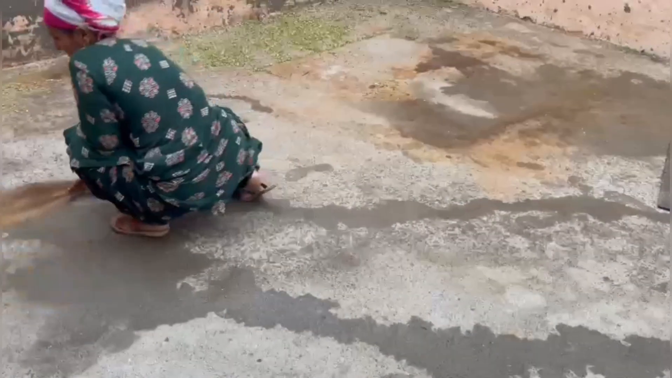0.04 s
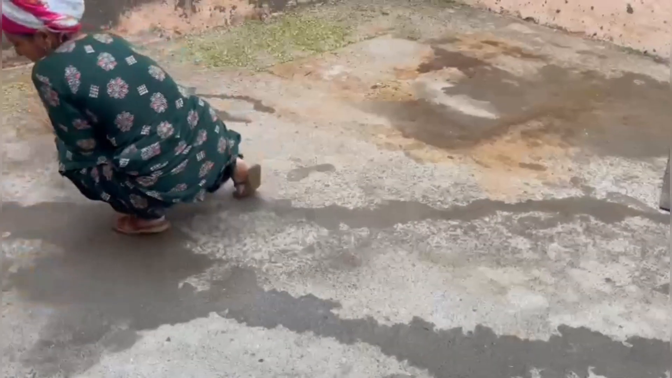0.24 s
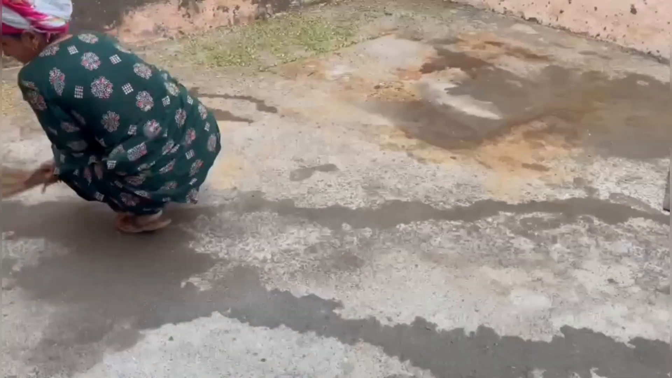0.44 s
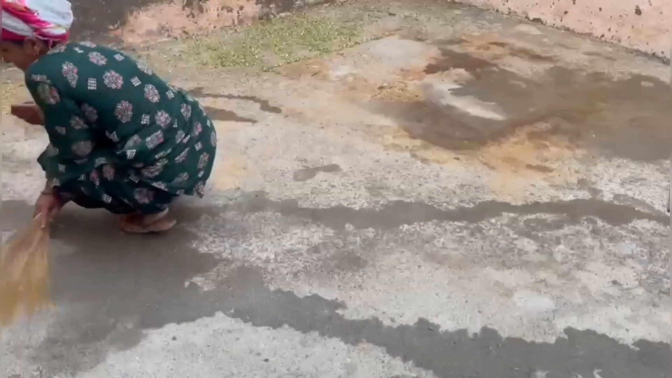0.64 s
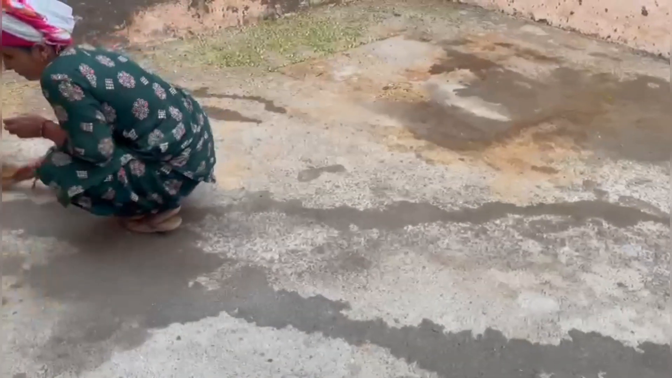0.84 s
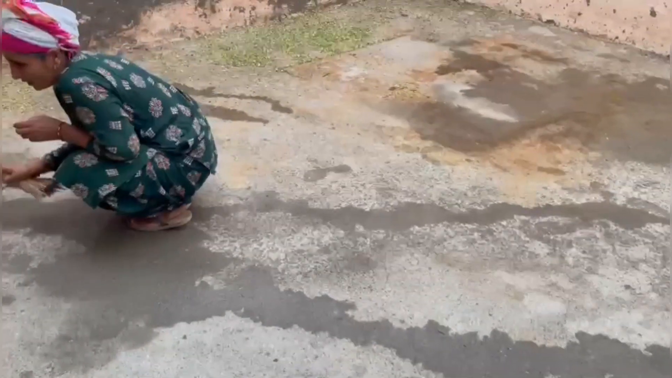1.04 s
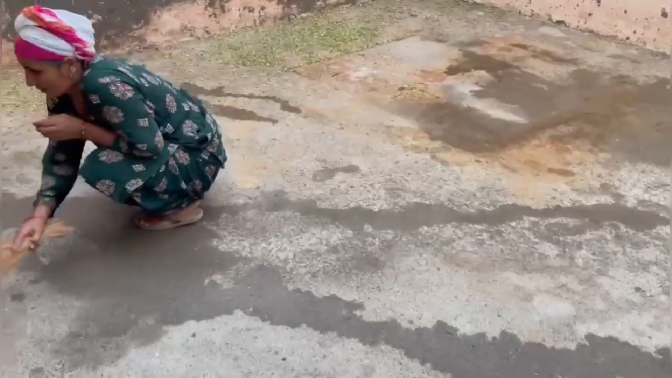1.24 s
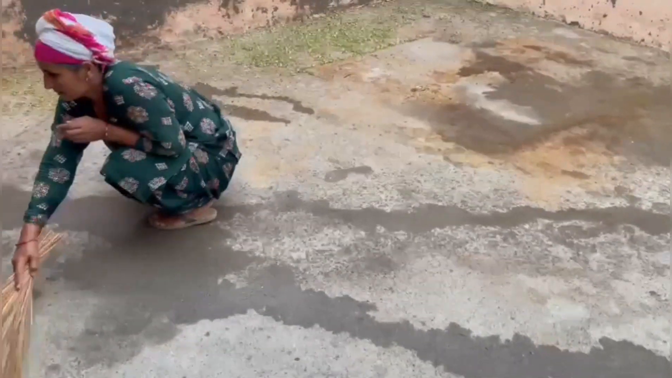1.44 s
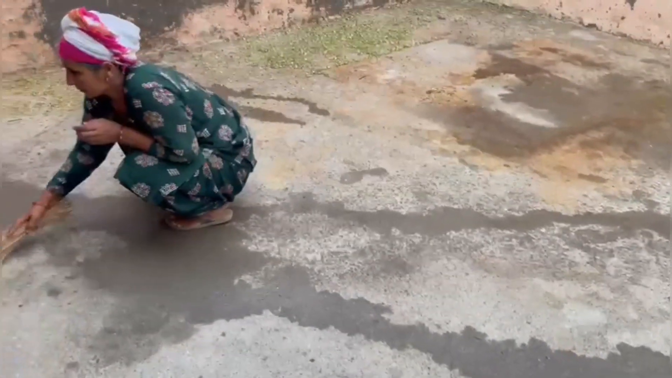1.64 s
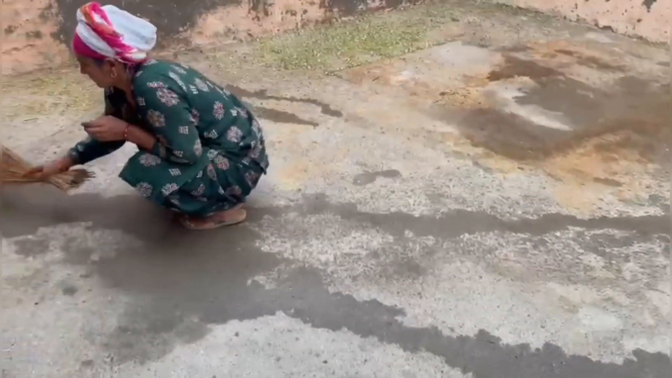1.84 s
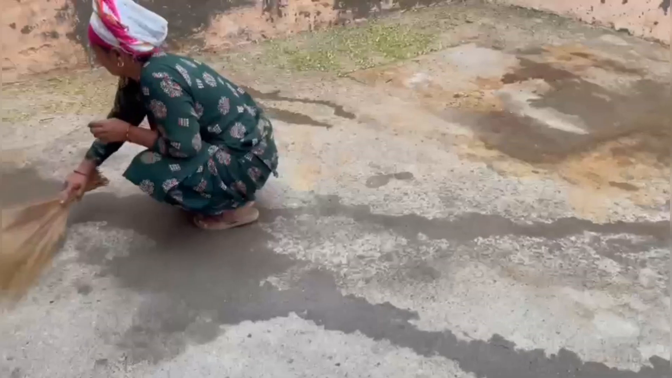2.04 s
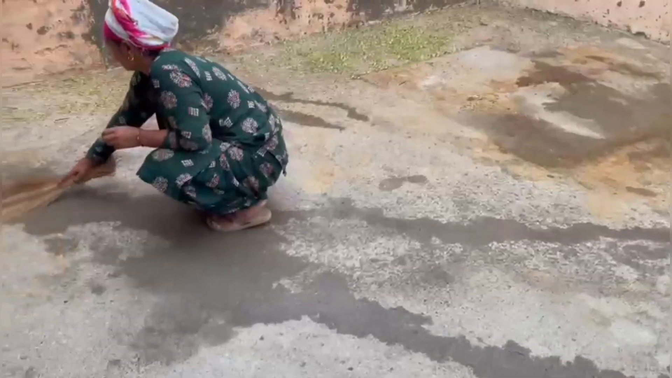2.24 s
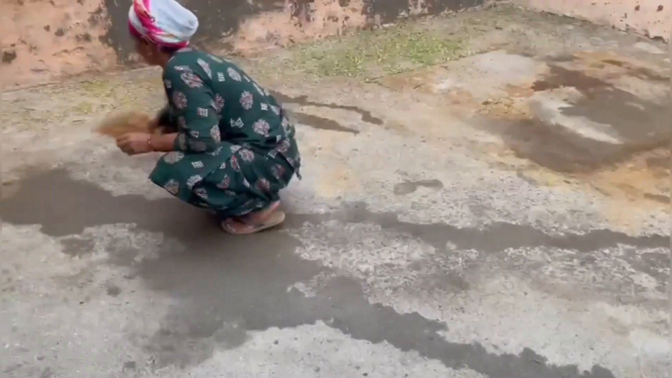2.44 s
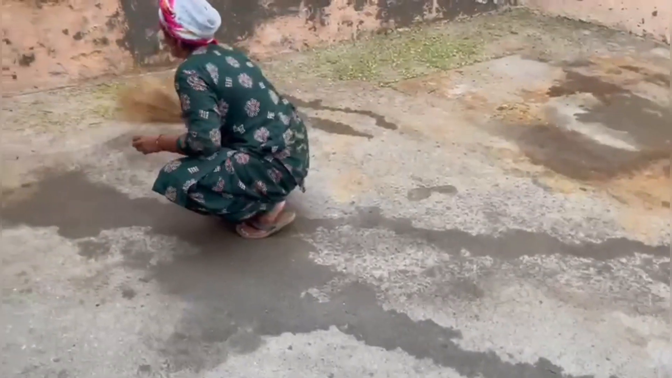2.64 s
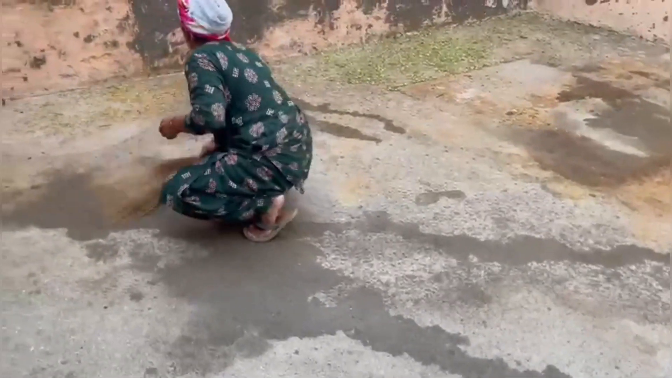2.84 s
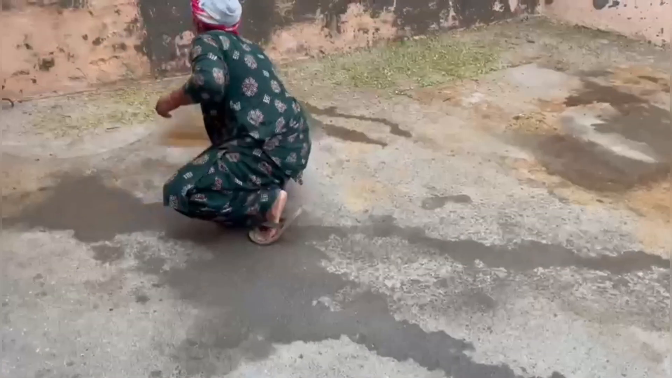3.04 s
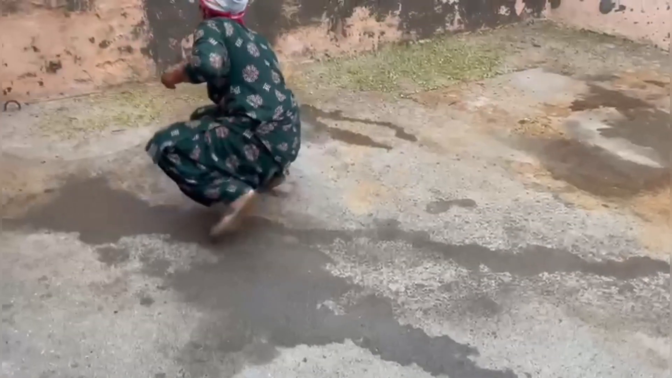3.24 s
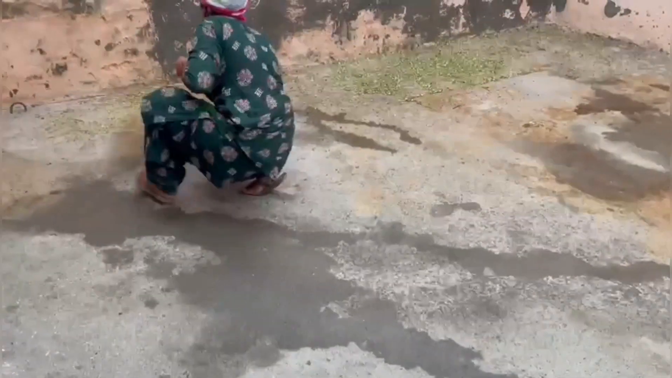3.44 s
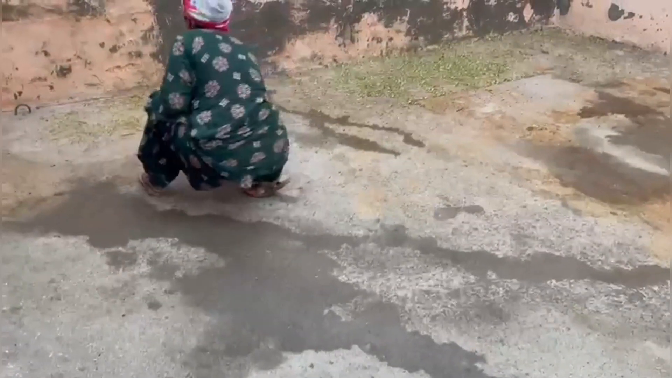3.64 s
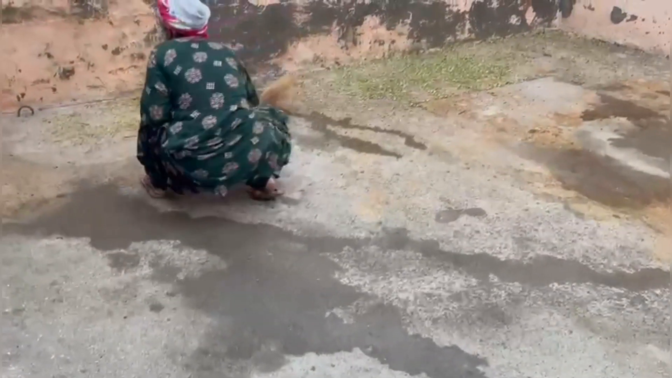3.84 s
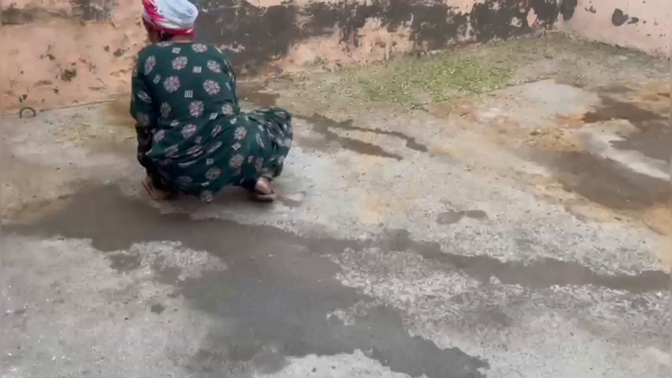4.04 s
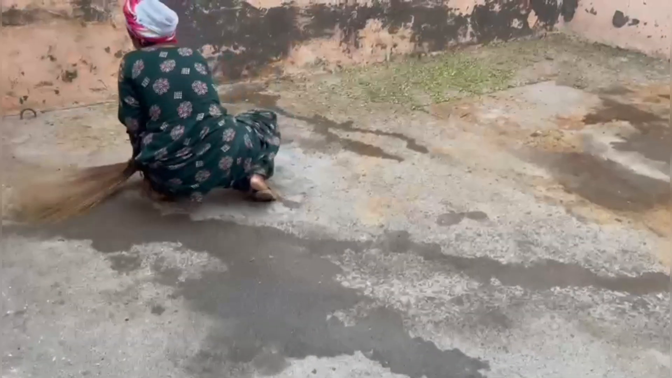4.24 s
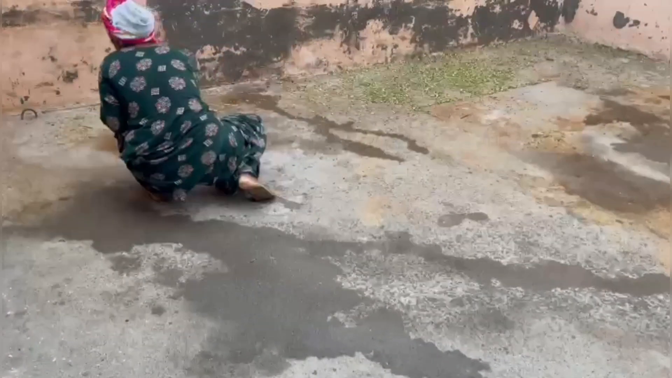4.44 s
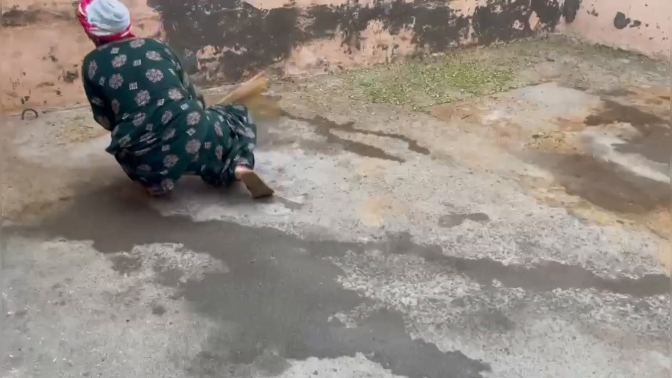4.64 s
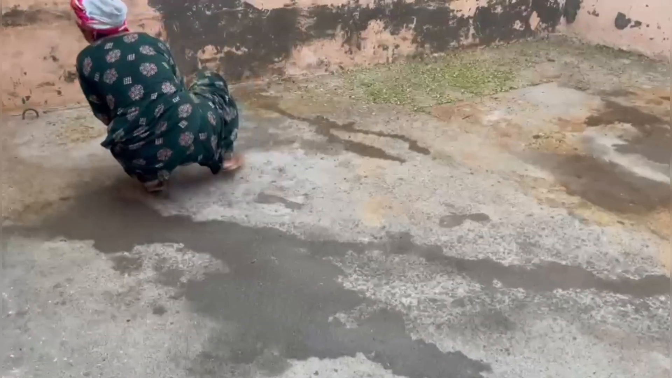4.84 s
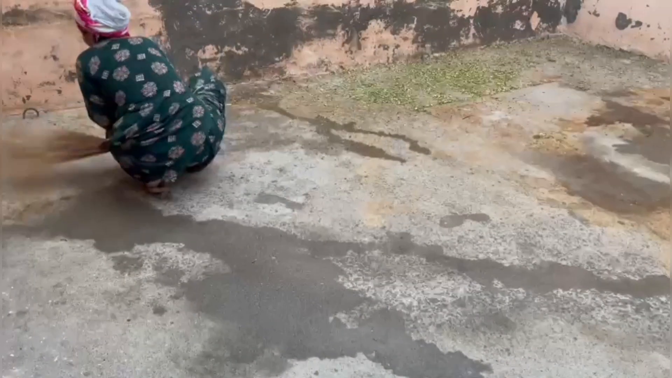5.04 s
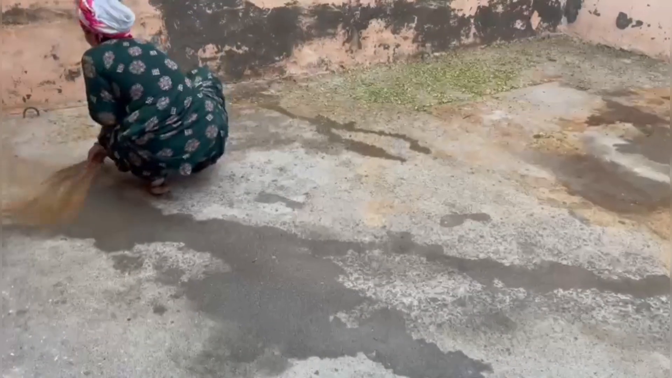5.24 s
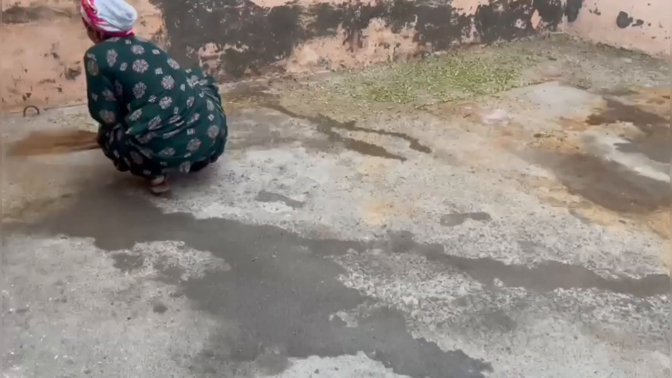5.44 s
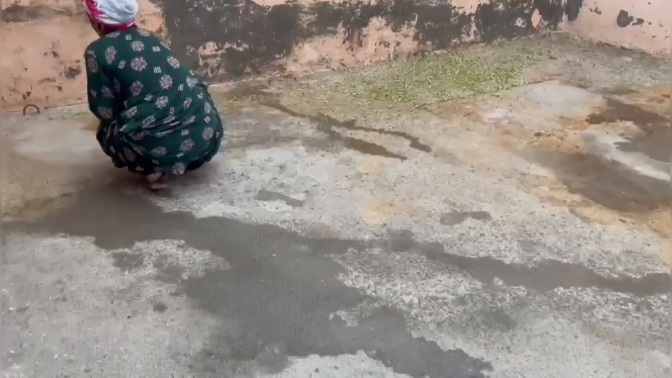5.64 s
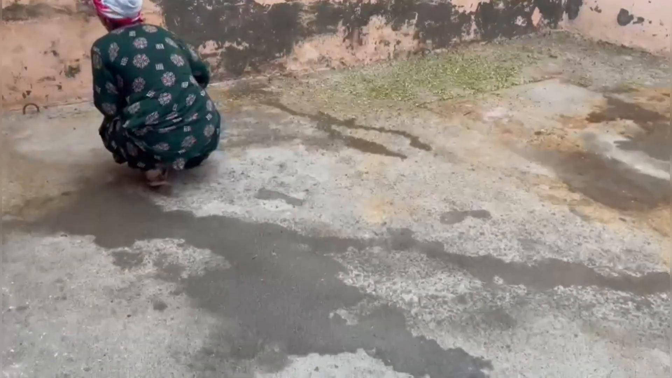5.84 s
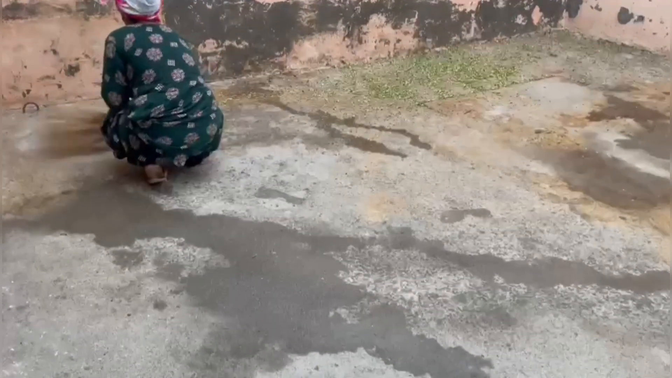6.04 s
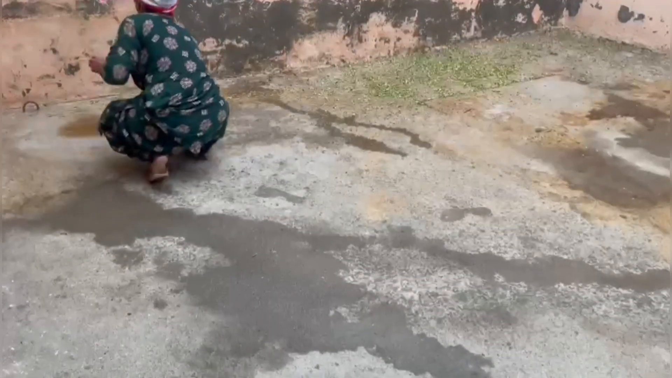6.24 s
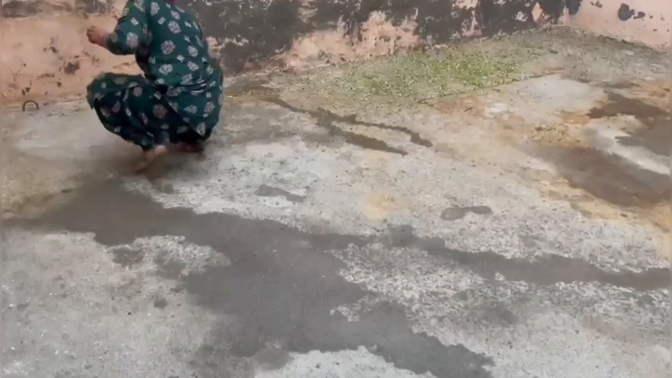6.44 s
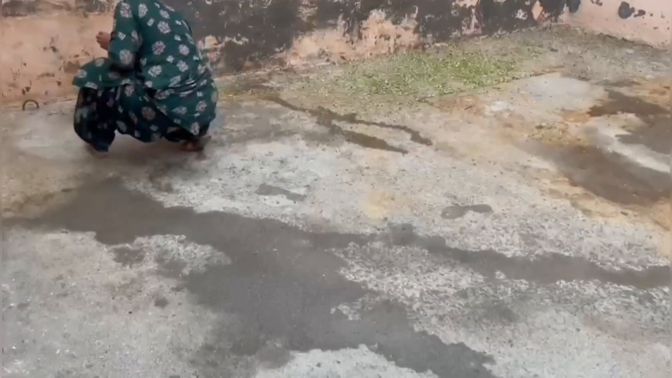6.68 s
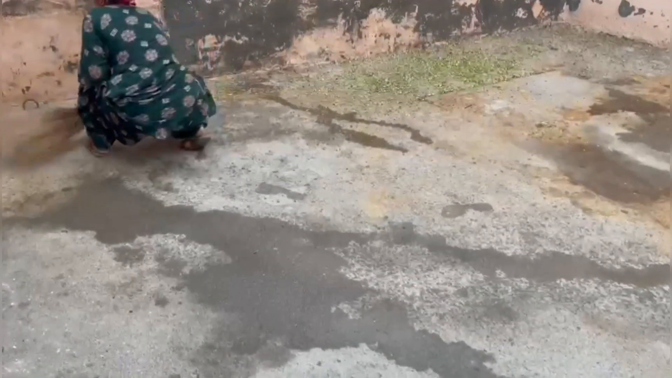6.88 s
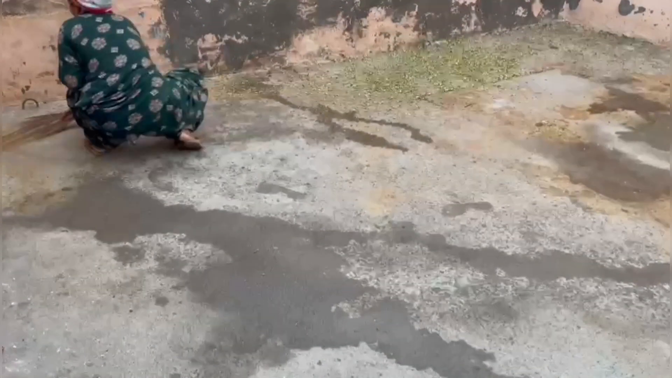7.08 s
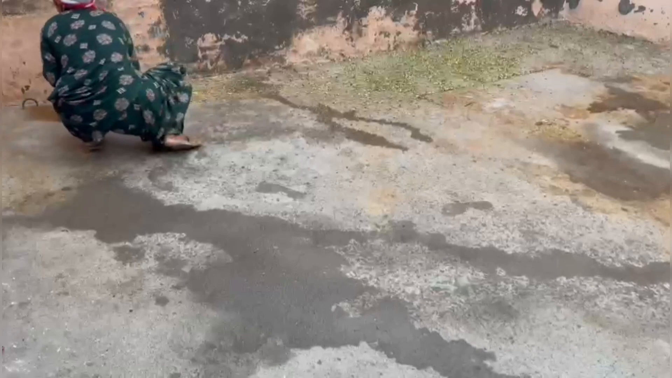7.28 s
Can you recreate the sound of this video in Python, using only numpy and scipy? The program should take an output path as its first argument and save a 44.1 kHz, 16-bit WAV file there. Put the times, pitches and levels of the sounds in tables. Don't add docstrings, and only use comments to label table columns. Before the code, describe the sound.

A straw broom swishes in quick, raspy strokes over gritty wet concrete in a walled yard, with sandal slaps and distant traffic rumble.

```python
import sys
import numpy as np
from scipy import signal
from scipy.fft import rfft, irfft
from scipy.io import wavfile
from scipy.ndimage import uniform_filter1d

SR = 44100
rng = np.random.default_rng(int(sys.argv[2]) if len(sys.argv) > 2 else 0)


def boost_factor(decibels):
    exponent = np.asarray(decibels, float) / 20
    return 10 ** exponent


def log_audio(samples):
    frames = np.atleast_2d(samples).T
    limited = np.clip(frames, -1, 1)
    pcm = np.round(limited * 32767).astype(np.int16)
    wavfile.write(sys.argv[1], SR, pcm)


N = 322371
TIME = np.arange(N) / SR
HZ = np.maximum(np.arange(N // 2 + 1) * SR / N, 1)


def unit(x):
    return x / np.sqrt(np.mean(x ** 2))


def on_hz(table, column=1):
    table = np.array(table)
    return np.interp(np.log(HZ), np.log(np.maximum(table[:, 0], 1)), table[:, column])


def colour(x, gain):
    return irfft(rfft(x) * gain, N)


def ring(x, hz, width_hz):
    return signal.lfilter(*signal.iirpeak(min(hz, .45 * SR), hz / width_hz, fs=SR), x)


def walk(rate):
    hold = int(SR / rate)
    levels = np.repeat(rng.standard_normal(N // hold + 1), hold)
    return 1.46 * uniform_filter1d(uniform_filter1d(levels, hold), hold)[:N]


def burst(s, decay_s, rise_s):
    start = int(s * SR)
    t = TIME[:min(SR // 3, N - start)]
    return slice(start, start + len(t)), (1 - np.exp(-t / rise_s)) * np.exp(-t / decay_s)


def swells(rows):
    return sum(db * np.exp(-((TIME - s) / max(length_s, .02)) ** 2) for s, length_s, db in rows)


# f/Hz, level/dB [per Hz]
TOWN_COLOUR = [(15, -44), (25, -1.5), (78, 2), (183, -11.5), (340, -30), (587, -31.5), (1040, -39.5),
               (1240, -35), (1710, -35), (2030, -38), (2740, -53.5), (3030, -74), (9500, -39.5),
               (12400, -78.5), (20900, -120)]
# t/s, length/s, level/dB
ENGINE_SURGES = [
    (.66, 0.11, 6),
    (2.15, .2, -8),
    (3.03, 0.1, -9),
    (3.35, 0.3, 3),
    (5.65, 0.077, 2),
    (6.1, 0.041, 3.5),
    (6.6, 0.12, 5),
]
# t/s, length/s, level/dB [over the rumble]
VEHICLE_PASSES = [
    (1.2, .08, -7.5),
    (2.1, 0.39, 2.5),
    (2.9, 0.27, 3.5),
    (3.65, 0.15, 7.5),
    (4.7, 0.3, 2.5),
    (6.4, 0.067, 2.5),
]
ENGINE_FAR_DB, ENGINE_NEAR_DB, ENGINE_NEARS_S, ENGINE_TAKES_S = -51, -45, 4.68, 0.1
DRONE_HZ, DRONE_DB = 48.6, 1
TRAFFIC_DB, FLICKER_DB, AIR_DB = -50, 0.5, -55
VAN_S, VAN_LENGTH_S, VAN_HZ, VAN_DB = 2.11, 0.38, 100, -47.5


def town():
    far = rfft(rng.standard_normal((2, N))) * boost_factor(on_hz(TOWN_COLOUR))
    deep = 1 / (1 + (HZ / 82) ** 8)
    bass = 1 / (1 + (HZ / 300) ** 4)
    drone, traffic, air = (unit(irfft(far * share, N)) for share in (deep, bass * (1 - deep), 1 - bass))
    drone = drone + boost_factor(DRONE_DB) * unit(ring(rng.standard_normal(N), DRONE_HZ, 8.4))
    nearing = .5 + .5 * np.tanh((TIME - ENGINE_NEARS_S) / ENGINE_TAKES_S)
    drone_db = ENGINE_FAR_DB + (ENGINE_NEAR_DB - ENGINE_FAR_DB) * nearing + swells(ENGINE_SURGES)
    traffic_db = TRAFFIC_DB + swells(VEHICLE_PASSES) + FLICKER_DB * walk(11)
    low = drone * boost_factor(drone_db - 2) + traffic * boost_factor(traffic_db)
    van = unit(ring(rng.standard_normal(N), VAN_HZ, 7.4)) * np.exp(-((TIME - VAN_S) / VAN_LENGTH_S) ** 4)
    return low + boost_factor(VAN_DB) * van + air * boost_factor(AIR_DB + 1.6 * walk(2.9))


BIRD_S, BIRD_HOLD_S, BIRD_HZ, BIRD_DB = 4.99, 0.14, 2830, -58
BIRD_RISE_S, BIRD_FADE_S, BIRD_SAG_DB, BIRD_FLUTTER_DB = 0.089, 0.043, -9, 2.5


def bird():
    tone = np.sin(2 * np.pi * np.cumsum(BIRD_HZ + 45 * walk(200)) / SR)
    t = TIME - BIRD_S
    edge = np.minimum(t, 0) / BIRD_RISE_S + np.maximum(t - BIRD_HOLD_S, 0) / BIRD_FADE_S
    sag_db = BIRD_SAG_DB * np.clip(t / BIRD_HOLD_S, 0, 1)
    return tone * np.exp(-edge ** 2) * boost_factor(BIRD_DB + sag_db + BIRD_FLUTTER_DB * walk(130))


# t/s, peak level/dB, thud f/Hz, sole slap level/dB [re thud], smear/s
SANDAL_STEPS = [
    (0.322, -38.5, 226, 7, 0.034),
    (1.739, -36.5, 136, -4, 0.014),
    (2.067, -39, 174, -35, 0.064),
    (2.732, -38, 121, -22.5, 0.015),
    (3.228, -30, 191, -25, 0.031),
    (3.619, -30, 230, -11, 0.0095),
    (3.951, -34, 174, -31, 0.016),
    (4.787, -27, 194, 0, 0.017),
    (6.046, -44, 178, 1, 0.019),
    (6.719, -49.5, 184, 4.5, 0.061),
]
HEEL_LATE_S = 0.011


def sandals():
    out = np.zeros((2, N))
    for s, db, hz, slap_db, smear_s in SANDAL_STEPS:
        at, shape = burst(s - .008, max(smear_s, .003), 0.014)
        noise = rng.standard_normal((2, 2, SR // 3))[..., :len(shape)]
        slap = unit(ring(noise[0], 1300, 1000)) + 0.033 * unit(ring(noise[0], 6000, 2500))
        heel = np.interp(TIME[:len(shape)] - HEEL_LATE_S, TIME[:len(shape)], shape)
        thud = heel * unit(ring(noise[1], hz, 57))
        out[:, at] += boost_factor(db) * (boost_factor(slap_db) * shape * slap + thud)
    return out


# t/s, peak level/dB, centre f/Hz, decay/s
STRAW_TICKS = [
    (0.318, -34, 1840, 0.029),
    (0.5737, -31.5, 8250, 0.067),
    (2.061, -30, 7640, 0.019),
    (3.5342, -40, 8830, 0.03),
    (4.2414, -35, 8070, 0.052),
    (5.0142, -40, 2880, 0.058),
    (5.1966, -36, 8700, 0.041),
    (6.104, -36, 8230, 0.03),
    (6.7087, -31, 8800, 0.023),
    (6.9466, -31, 8830, 0.03),
]


def ticks():
    out = np.zeros((2, N))
    for s, db, hz, decay_s in STRAW_TICKS:
        at, shape = burst(s, max(decay_s, .001), 0.0018)
        noise = rng.standard_normal((2, SR // 3))[:, :len(shape)]
        out[:, at] += boost_factor(db - 12.0) * shape * unit(ring(noise, hz, 0.48 * hz))
    return out


# t/s, peak level/dB,
# centre f/Hz, width f/Hz
GRIT_KNOCKS = [(.310, -26, 1230, 1500), (.319, -22.5, 1680, 4460), (.334, -38.5, 1600, 2005),
               (.352, -30, 1900, 1425), (.365, -33, 2000, 1500), (1.2165, -41, 8950, 6060),
               (1.221, -30, 8200, 9050), (1.237, -24, 10000, 8000), (1.243, -32, 6000, 8000),
               (1.254, -25, 10000, 7000), (1.259, -27, 10000, 7000), (1.287, -36, 9800, 5000),
               (1.398, -37, 10000, 3000), (2.020, -56, 10100, 3020), (2.063, -30, 8500, 7000),
               (2.7945, -29.5, 7000, 9060), (2.810, -34, 8500, 5030), (3.467, -42, 4180, 4000),
               (4.102, -49, 10070, 1977), (4.122, -45, 9820, 2000), (5.014, -32, 9800, 4000),
               (5.13, -43, 9400, 4000), (5.135, -45, 9600, 4000), (5.141, -38.5, 9800, 4030),
               (6.609, -34, 8400, 6400), (6.808, -43, 8500, 6040), (6.947, -46, 8700, 7000)]
GRIT_SPREAD = .75


def grit():
    out = np.zeros((2, N))
    knocks = rng.standard_normal((len(GRIT_KNOCKS), 2, 400)) * np.exp(-TIME[:400] / 0.0015)
    for (s, db, hz, width_hz), knock in zip(GRIT_KNOCKS, knocks):
        knock = ring(ring(knock, hz, GRIT_SPREAD * width_hz), hz, GRIT_SPREAD * width_hz)
        start = int(s * SR)
        out[:, start:start + 400] += boost_factor(db - 1.5) * knock / np.abs(knock).max(axis=1, keepdims=True)
    return out


# straws touch t/s, time to full speed/s, hold/s, scrape level/dB,
# low scrape from pressure level/dB [re scrape]
BROOM_STROKES = [(-.08, 0.13, 0.083, -17, -17), (0.553, 0.051, 0.031, -31.5, -21),
                 (0.623, 0.14, 0.084, -18, -16), (1.187, 0.061, 0.037, -52, -11),
                 (1.393, 0.093, 0.075, -27, -14.5), (1.558, 0.12, 0.068, -19.5, -16),
                 (2.069, .19, .17, -17, -16), (2.817, .05, 0.039, -40, -12), (2.899, 0.12, 0.15, -20, -15),
                 (3.512, 0.16, 0.13, -21.5, -14.5), (4.211, 0.047, 0.012, -38.5, -17),
                 (4.284, 0.14, 0.074, -19.5, -18), (4.5, 0.057, 0.044, -29.5, -14.5),
                 (4.729, 0.064, 0.022, -47.5, -3.5), (5.178, 0.027, 0.027, -38, -20),
                 (5.223, .14, .16, -17.5, -17), (5.589, .1, 0.083, -29.5, -11.5),
                 (6.087, 0.028, 0.035, -41.5, -14.5), (6.139, .13, .1, -21.5, -13),
                 (6.402, 0.054, 0.029, -39.5, -7), (6.92, 0.047, 0.039, -37, -15.5),
                 (6.972, .11, 0.012, -20.5, -15.5), (7.088, 0.17, .1, -23.5, -14.5)]
TOUCH_S, TOUCH_DB, RISE_BEND = .022, -25.5, 1.42
SAG_DB_PER_S, LIFT_DB_PER_S, LIFT_KNEE_S = 13, 207, 0.028
TRAIL_DB, TRAIL_DB_PER_S = -14, 103
SLOW_PRESS, TIPS_FIRST, SLOW_DULL = 0.12, 0.033, 0.02


def effort():
    power, press, bright = 1e-10, 0, 0
    coarse = TIME[::32]
    for s, rise_s, hold_s, db, press_db in BROOM_STROKES:
        t = coarse - s
        early_db = TOUCH_DB * np.clip(1 - t / rise_s, 0, 1) ** RISE_BEND
        held = np.clip(t - rise_s, 0, hold_s)
        lifted = np.maximum(t - rise_s - hold_s, 0)
        lift_db = -LIFT_DB_PER_S * (np.hypot(lifted, LIFT_KNEE_S) - LIFT_KNEE_S)
        trail_db = TRAIL_DB - TRAIL_DB_PER_S * lifted
        late_db = 10 * np.log10(boost_factor(2 * lift_db) + boost_factor(2 * trail_db)) - SAG_DB_PER_S * held
        p = (np.clip(t / TOUCH_S, 0, 1) * boost_factor(db + early_db + late_db)) ** 2
        late_db = np.maximum(late_db, -50)
        power = power + p
        press = press + p * (press_db - SLOW_PRESS * late_db)
        bright = bright + p * (SLOW_DULL * late_db - TIPS_FIRST * early_db)
    return (np.interp(TIME, coarse, v) for v in (10 * np.log10(power), press / power, bright / power))


# f/Hz, level/dB [per Hz]
STRAW_COLOUR = [(250, -27), (600, -25.5), (1000, -20.5), (1700, -11.5), (2500, -16), (5000, -14),
                (6500, -13.5), (8000, -9.5), (9500, -2.5), (10500, 2), (11300, -3), (12500, -39)]
SLIPS_PER_S, SLIP_SCATTER_DB, PATCHY_DB = 4000, 2, 2


def broom():
    scrape_db, press_db, bright_db = effort()
    busy = .3 + .7 * boost_factor(.5 * (scrape_db - scrape_db.max()))
    out, sway = np.zeros((2, N)), walk(14)
    for hz in 300 * 2 ** np.arange(0, 5.6, .4):
        odds = np.minimum(SLIPS_PER_S * busy * (hz / 3000) ** .6 / SR, 1)
        slips = (rng.random((2, N)) < odds) * rng.choice([-1, 1], (2, N)) / np.sqrt(odds)
        slips = slips * boost_factor(SLIP_SCATTER_DB * rng.exponential(size=(2, N)))
        group = unit(ring(slips, hz, 0.33 * hz))
        thick = 1 / (1 + (hz / 2700) ** 4)
        db = thick * (press_db + 14.5) + (1 - thick) * bright_db * np.log2(hz / 6000)
        out += group * np.sqrt(hz) * boost_factor(db + PATCHY_DB * (walk(30) + 0.16 * sway))
    return unit(colour(out, boost_factor(on_hz(STRAW_COLOUR)))) * boost_factor(scrape_db + 4.0)


YARD_T60_S, YARD_DB, YARD_TOP_HZ = 0.71, -11, 7000


def scene():
    near = broom() + sandals() + ticks() + grit() + bird()
    echo = rng.standard_normal((2, N)) * np.exp(-np.log(1000) * TIME / YARD_T60_S) * (TIME > .012)
    echo = echo / np.sqrt(np.sum(echo ** 2, axis=1, keepdims=True))
    echo = rfft(echo) / (1 + (HZ / YARD_TOP_HZ) ** 2)
    return near + boost_factor(YARD_DB) * colour(near, echo) + town()


# f/Hz, phase/rad
LEFT_LEAD = [(0, 0), (1100, .3), (1500, 2.9), (1850, 3.6), (2250, 6.28), (5400, 6.7), (6500, 6.35),
             (7500, 7.0), (8350, 6.28), (8800, 6.28), (9700, 3.3), (10000, 3.14), (10450, 3.14),
             (10850, 2.4), (11200, .8), (11500, 0), (13000, 0)]
# f/Hz, likeness [0-1], left minus right level/dB
PORT_PAIR = [(60, .99, .5), (170, .88, 4.5), (500, .55, 2), (1000, .5, 2), (1550, .78, 0), (1900, .55, 0),
             (2500, .85, .5), (3000, .4, 3), (3900, .85, 1.5), (5300, .45, 4.5), (6500, .85, 1.5),
             (7400, .7, 2.5), (8300, 1, 0), (10500, .98, 0), (11100, .7, 0), (11500, .9, 0),
             (11900, .97, 0)]
BASS_CUT_HZ, TREBLE_CUT_HZ = 40.7, 11450


def microphone_ports(dry):
    alike = np.clip(on_hz(PORT_PAIR), 0, 1)
    lean = boost_factor(on_hz(PORT_PAIR, column=2) / 2)
    trim = np.sqrt((1 + (BASS_CUT_HZ / HZ) ** 12) * (1 + (HZ / TREBLE_CUT_HZ) ** 80))
    left, own = rfft(np.tanh(1.378 * dry) / 1.216) / trim
    slide = .1 / (1 + (HZ / 3500) ** 4) + .012 / (1 + (9300 / HZ) ** 20)
    rights = []
    for way in (-1, 1):
        lag = np.interp(HZ * (1 + way * slide), *np.transpose(LEFT_LEAD))
        right = alike * np.exp(-1j * lag) * left + np.sqrt(1 - alike ** 2) * own
        rights.append(irfft(right / lean, N))
    near, far = rights
    across = .5 + .5 * np.tanh(2 * walk(11))
    return np.array([irfft(left * lean, N), near + across * (far - near)])


def band_limit(x):
    return signal.sosfilt(signal.butter(12, 12300, fs=SR, output="sos"), x)


def record(dry):
    mix = microphone_ports(dry)
    return band_limit(mix)


dry = scene()
out = record(dry)
log_audio(out)
```